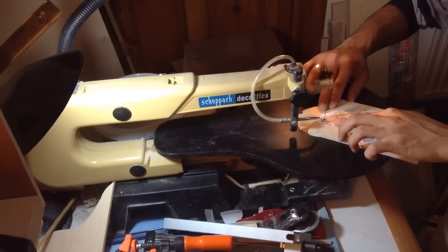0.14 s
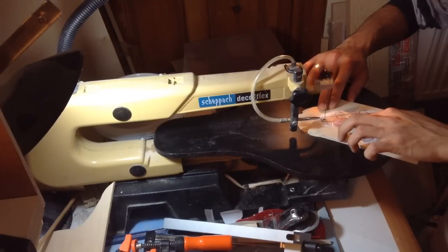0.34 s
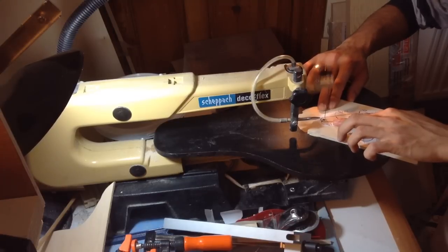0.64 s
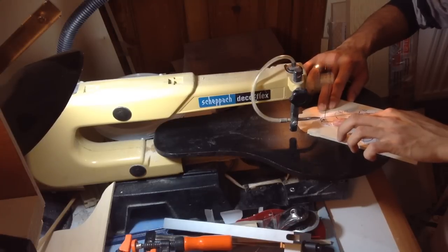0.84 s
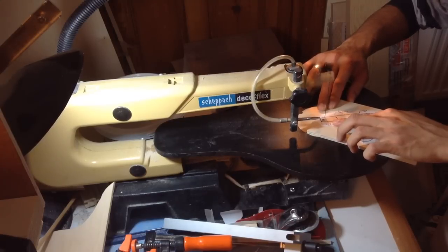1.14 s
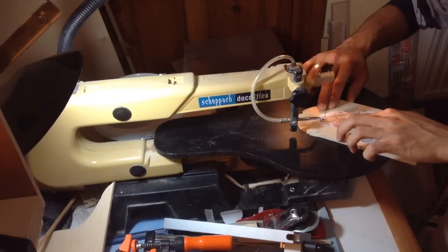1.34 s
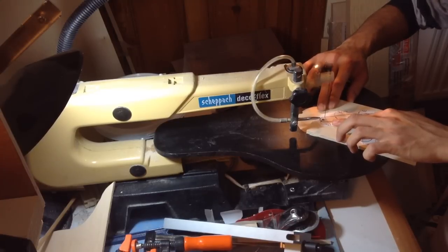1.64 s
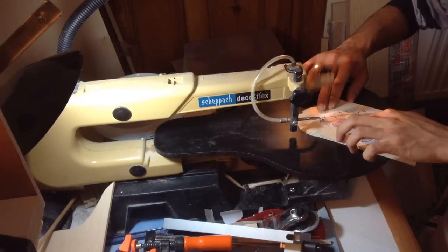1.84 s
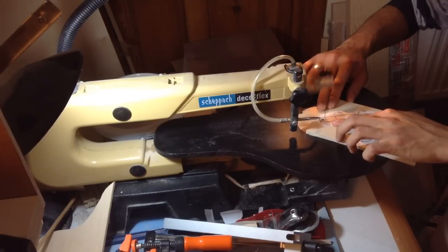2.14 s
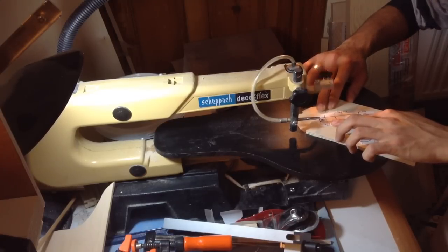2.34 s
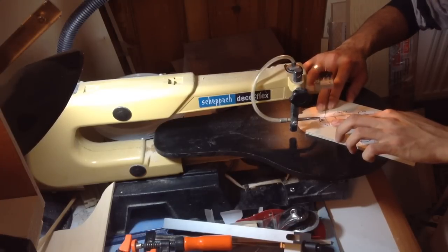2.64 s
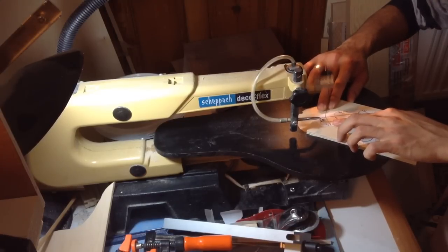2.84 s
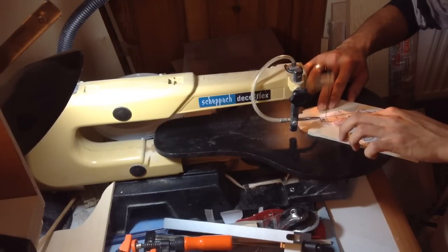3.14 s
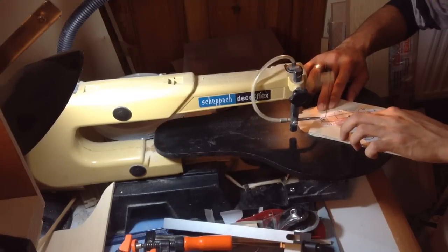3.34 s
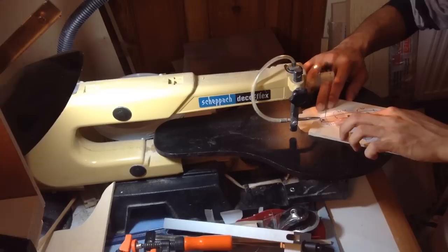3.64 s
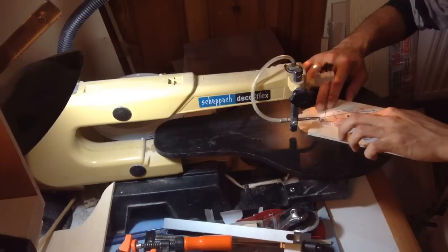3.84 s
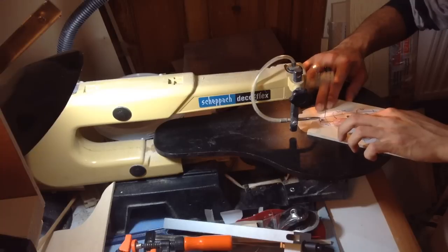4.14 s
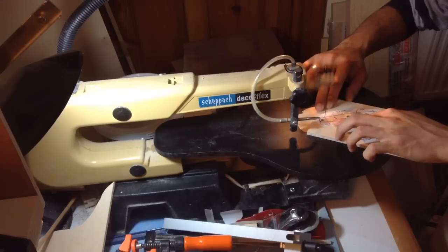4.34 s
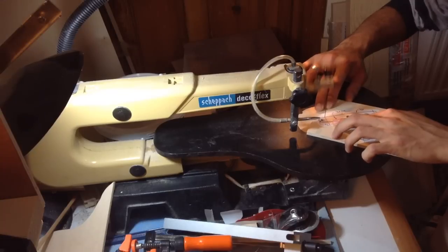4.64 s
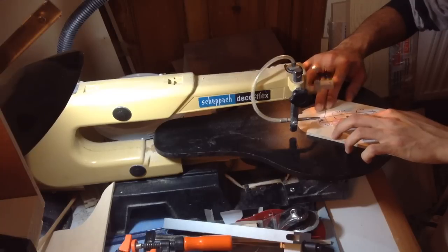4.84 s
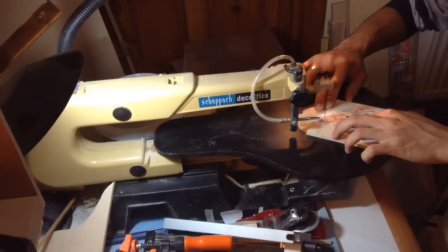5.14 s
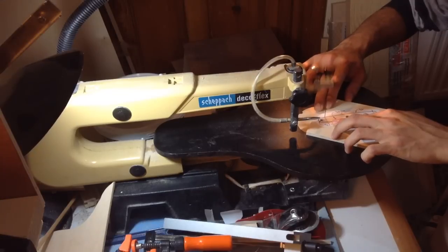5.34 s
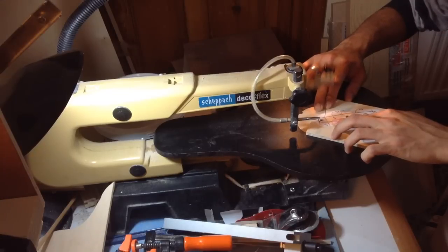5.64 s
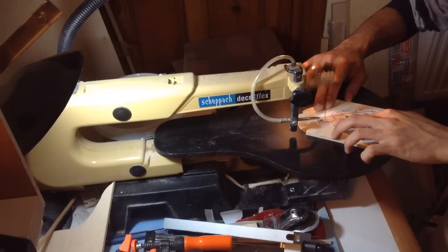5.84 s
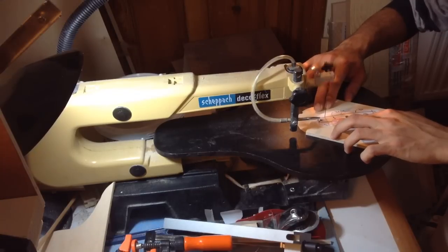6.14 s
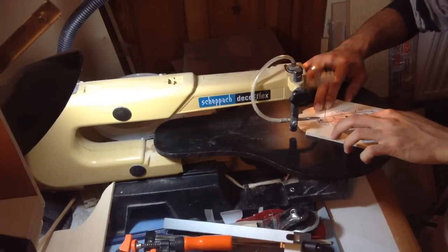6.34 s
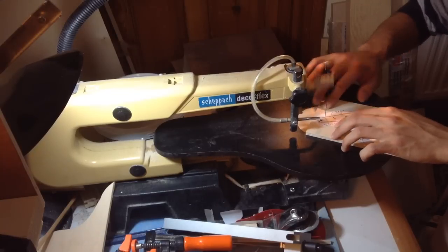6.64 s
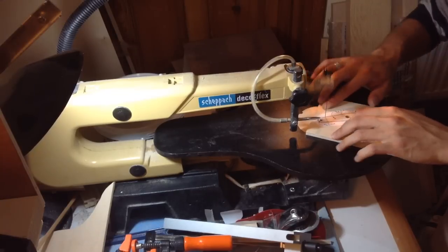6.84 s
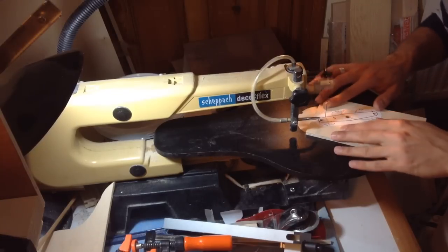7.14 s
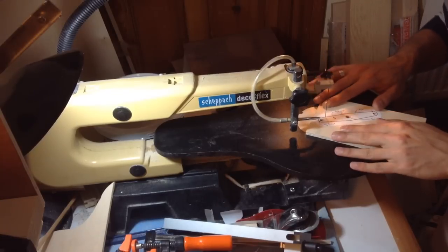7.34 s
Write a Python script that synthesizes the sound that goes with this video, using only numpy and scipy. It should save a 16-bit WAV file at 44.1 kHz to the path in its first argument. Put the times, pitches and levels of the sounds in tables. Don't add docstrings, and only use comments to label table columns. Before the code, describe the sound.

Close, fairly dry sound of a small motor saw in a little room: a rapid pulsing buzz of board hum, rattling wood, coarse rasp and thin hiss over steady fan air. Cutting drops away around three seconds, leaving a few light wooden taps and one firmer knock, then resumes at full strength. In the last second it turns into a looser, more tonal fluttering buzz, still running at the end.

```python
import sys
import numpy as np
from scipy import signal
from scipy.fft import irfft
from scipy.io import wavfile
from scipy.ndimage import uniform_filter1d

SR = 44100
rng = np.random.default_rng(int(sys.argv[2]) if len(sys.argv) > 2 else 0)


def level_to_linear(level):
    exponent = np.asarray(level, float) / 20
    return 10 ** exponent


def unload_audio(sound):
    columns = np.transpose(np.atleast_2d(sound))
    steps = np.round(np.clip(columns, -1, 1) * 32767)
    wavfile.write(sys.argv[1], SR, steps.astype(np.int16))


N = 330750
T = np.arange(N) / SR
STROKES_PER_S = 9.54

# (time [s], lead [turns])
STROKE_LEAD = [(0.2, 0.025), (1, 0.027), (1.8, 0.019), (2.6, 0.017), (3, 0.069), (3.3, 0.09), (3.6, 0.154),
               (4, 0.152), (4.8, 0.156), (5.6, 0.152), (6.4, 0.155), (7, 0.199), (7.3, 0.235)]


def crank():
    return STROKES_PER_S * T + np.interp(T, *np.transpose(STROKE_LEAD))


TURNS = crank()

# (time [s], share [0-1])
SINGING = [(0, .15), (2.85, .15), (2.95, 0), (3.55, 0), (3.8, .15), (4.6, .35), (6.3, .3), (6.7, .75),
           (7.5, .82)]


def board():
    share = np.clip(np.interp(T, *np.transpose(SINGING)), 0, 1)
    return level(part=1) * board_hum(share) + level(part=2) * board_clatter(share)


# (frequency [Hz], density [dB per Hz])
BOARD = [(200, -60), (300, -28), (360, -18), (480, -15.5), (560, -16.5), (640, -34.5), (800, -60)]
# (frequency [Hz], width [Hz], height over the smooth colour [dB])
BOARD_MODES = [(442.2, 13, 14), (458, 50, 11.6), (496, 5.4, 16.7), (529.6, 10.7, 23.6)]


def board_hum(share):
    teeth_passed = 56 / (2 * np.pi) * np.sin(2 * np.pi * (TURNS - .43))
    knocks = 2.1 * repeating(0.852) + 0.29 * np.cos(2 * np.pi * teeth_passed)
    loose = 0.64 * rng.standard_normal(N)
    turning = (STROKES_PER_S * T - .8 + .5) % 1 - .5
    note_hz = 526 - 110 * np.exp(-((turning + .01) / .11) ** 2)
    unbroken = 1 - .8 * np.exp(-((turning - .05) / .08) ** 2)
    note = evened(np.sin(2 * np.pi * np.cumsum(note_hz) / SR) * unbroken)
    flutter_band = signal.butter(2, [25, 80], "band", fs=SR)
    flutter = evened(signal.lfilter(*flutter_band, rng.standard_normal(N)))
    note = evened(note * (1 + .25 * flutter))
    ringing = coloured(knocks + loose, BOARD, BOARD_MODES)
    return np.sqrt(share) * note + np.sqrt(1 - share) * ringing


# (frequency [Hz], density [dB per Hz])
CLATTER = [(400, -44.5), (600, -25), (720, -18.5), (850, -22.5), (1050, -22.5), (1300, -22.5),
           (1800, -46.5)]
# (frequency [Hz], width [Hz], height [dB])
CLATTER_MODES = [(678.4, 8.9, 14.8), (700, 3.8, 5.8), (790, 3.7, 2.3), (828, 17, 3.1), (896, 14, 13),
                 (962, 11.5, 18.3), (1002, 10.4, 10.9), (1048.3, 5.8, 12.1)]
# (centre [turns], rise [turns], fall [turns], level [dB])
CLATTER_BURSTS = [(.45, 0.13, 0.17, -3.5), (.97, 0.24, 0.27, 0.5)]
# (frequency [Hz], width [Hz], height [dB])
LOOSE_MODES = [(684, 15, 22), (679, 5.5, 14), (807, 16, 11), (860, 48, 18.5), (890, 11, -10),
               (1052, 17, 13)]
# (centre [turns], rise [turns], fall [turns], level [dB])
LOOSE_BURSTS = [(0.52, 0.02, 0.05, -1.5), (.02, 0.12, 0.14, -23)]


def board_clatter(share):
    tooth_top_hz, tooth_turns, tooth_share = 1132, 0.079, 0.92
    mid_stroke = (TURNS - .42 + .5) % 1 - .5
    stroke = np.floor(TURNS - .42 + 1.5).astype(int)
    luck = rng.uniform(-1, 1, (80, 2))[stroke].T
    tooth_hz = (1 + 0.065 * luck[1] - 0.081 * share) * tooth_top_hz
    tooth_wave = np.cos(tooth_hz / STROKES_PER_S * np.sin(2 * np.pi * mid_stroke))
    bite = level_to_linear(2.7 * luck[0]) * np.exp(-(mid_stroke / tooth_turns) ** 2) * tooth_wave
    rattle = 1.08 * repeating(0.688) + rng.standard_normal(N) + tooth_share * bite
    tight = coloured(rattle * bursts(CLATTER_BURSTS, -6, 2.55), CLATTER, CLATTER_MODES)
    slack = coloured(rattle * bursts(LOOSE_BURSTS, -9, 0.89), CLATTER, LOOSE_MODES)
    return np.sqrt(1 - share ** 2) * tight + share * slack


# (frequency [Hz], density [dB per Hz])
TEETH = [(900, -39), (1300, -23.5), (1600, -11.5), (2100, -4), (2600, -9.5), (3300, -8.5), (4000, -15),
         (5500, -28)]
# (frequency [Hz], width [Hz], height [dB])
TEETH_MODES = [(1437, 18, 16.3), (1603, 45, 12.4), (1674, 34, 11.3), (1990, 52, 12.7), (2064, 80, 4.9),
               (2170, 56, 3.2), (2393, 53, 9.7), (2675, 51, 2.9), (3020, 40, 6.5)]
# (frequency [Hz], width [Hz], height [dB])
DRAG_MODES = [(1464, 29, 8.5), (1618, 43, 13.5), (1682, 18, 16.5), (1870, 75, 9), (2167, 35, 11),
              (2296, 46, 8.5), (2373, 23, 13), (2760, 68, 2), (3036, 67, 5.5)]
# (centre [turns], rise [turns], fall [turns], level [dB])
RASP_BURSTS = [
    (0.45, 0.09, 0.099, 2.5),
    (0.9, 0.052, 0.25, 1),
    (0.011, 0.028, 0.094, -3.5),
]
# (frequency [Hz], density [dB per Hz])
BLADE = [(3000, -36), (3800, -41), (4500, -6.5), (5700, -4), (6400, -9), (7100, -1.5), (9300, -5),
         (11200, -4.5), (12200, -2.5), (13000, -11), (13800, -39), (14800, -25), (15300, -1.5)]
# (frequency [Hz], width [Hz], height [dB])
BLADE_MODES = [(6060, 46, 1.9), (5980, 63, 2.4), (6460, 45, 3.5), (6980, 40, 2.2), (6920, 200, 6.1),
               (7580, 25, 5.4), (7600, 25, 5.2), (7830, 50, 6.3), (9100, 37, 1.2), (9070, 38, 3.4),
               (9630, 94, 4.9), (10490, 130, 9.6), (12000, 45, 3.7), (12800, 40, 4)]
# (centre [turns], rise [turns], fall [turns], level [dB])
HISS_BURSTS = [
    (0.42, 0.052, 0.07, 6.1),
    (0.93, 0.072, 0.068, 0.5),
    (0.016, 0.023, 0.073, 6.3),
]


def cut():
    fibres = splinters(1500, 3.0, 0.31)
    down = workshop(fibres * bursts(RASP_BURSTS[:1], -13.5, 1.4), 0.11, -7.5)
    up = workshop(fibres * bursts(RASP_BURSTS[1:], -12.5, 1.25), 0.11, -9.5)
    rasp = evened(coloured(down, TEETH, TEETH_MODES) + 0.76 * coloured(up, TEETH, DRAG_MODES))
    hiss = workshop(splinters(2500, 4.8, 0.43) * bursts(HISS_BURSTS, -9, 0.65), 0.076, -2.7)
    return level(part=3) * rasp + level(part=4) * coloured(hiss, BLADE, BLADE_MODES)


# (frequency [Hz], density [dB per Hz])
FRAME = [(18, -85), (30, -51), (75, -66), (89, -19.5), (124, -2), (166, -0.5), (271, 6.5), (305, -1.5),
         (400, -6), (520, -19.5), (880, -120)]
# (frequency [Hz], width [Hz], height [dB])
FRAME_MODES = [(130.5, 5.2, 10.5), (291.6, 3, -19)]


def frame():
    drive = repeating(1.71) + 0.76 * rng.standard_normal(N)
    return level(part=0) * coloured(drive, FRAME, FRAME_MODES)


# (time [s], peak level [dB])
TAPS = [
    (3.185, -34),
    (3.258, -27.5),
    (3.314, -34),
    (3.352, -31),
    (3.369, -27),
    (3.377, -26),
    (3.4745, -15),
]
# (frequency [Hz], level [dB], decay time T60 [s])
TAP_MODES = [(240, -14, .04), (380, -10, .04), (511, -4, .07), (700, -8, .035), (845, 0, .035),
             (1050, -4, .03), (1160, -5, .025), (1900, -20, .025), (2370, -17, .025), (2745, -12, .025),
             (3430, -21, .02), (4183, -17, .02), (5012, -22, .015)]


def taps():
    out, t = np.zeros(N), T[:6000]
    crack_band = signal.butter(3, [300, 1500], "band", fs=SR)
    for s, peak_db in TAPS:
        ring = np.zeros(len(t))
        for hz, db, t60 in TAP_MODES:
            pitch = rng.uniform(.97, 1.03)
            ring += level_to_linear(db - 60 * t / t60) * np.sin(2 * np.pi * hz * pitch * t)
        crack = signal.lfilter(*crack_band, rng.standard_normal(len(t)))
        ring += 1.4 * level_to_linear(-60 * t / .045) * crack
        ring *= 1 - np.exp(-t / .0009)
        out[round(s * SR):][:len(t)] += level_to_linear(peak_db) * ring / abs(ring).max()
    return signal.lfilter(*signal.butter(2, 220, "high", fs=SR), out)


# (time [s], pressure [dB])
PUSH = [(0, 4.5), (.3, -2), (.6, 2), (.85, -3.5), (1.6, -0.5), (1.95, -0.5), (2.3, -4), (2.5, 2.5),
        (3.8, 1), (4.25, 0), (4.9, -6), (5.36, -2.5), (5.6, -1.5), (5.77, -9), (6.1, -2.5), (6.45, -0.5),
        (6.8, 3), (7.5, 1)]
# (level [dB], response to push [dB per dB], drift [dB per s], easing [dB], wander [dB])
PARTS = [
    (-37, 0.14, -0.27, -4.5, 0.06),
    (-26, 0.73, 0.0939, -0.2, 2),
    (-29, 0.51, -0.2051, -2.6, 0.5),
    (-30, -0.01, -0.32, 0, -0.7),
    (-41.5, 0.02, 0.56, -5, 0.67),
]
# (idling level [dB], leaving time [s], returning time [s])
IDLE = [
    (-48, 0.22, 0.38),
    (-43, 0.12, 0.1),
    (-50, 0.18, 0.16),
    (-49, 0.19, 0.15),
    (-55.5, 0.19, 0.16),
]


def level(part):
    cut_db, follow, drift_db, ease_db, wander_db = PARTS[part]
    idle_db, leaving_s, returning_s = IDLE[part]
    wander = np.interp(TURNS, np.arange(80), np.clip(rng.standard_normal(80), -2, 2))
    ease_from_s, ease_to_s = 6.53, 7.1
    easing = np.clip((T - ease_from_s) / (ease_to_s - ease_from_s), 0, 1)
    db = cut_db + follow * np.interp(T, *np.transpose(PUSH)) + drift_db * T + ease_db * easing
    return level_to_linear(idle_db + (db - idle_db) * contact(leaving_s, returning_s) + wander_db * wander)


def contact(leaving_s, returning_s):
    lifted_s, back_s = 2.992, 3.569
    return np.clip(np.maximum((lifted_s - T) / leaving_s, (T - back_s) / returning_s), 0, 1)


def repeating(drift_s, count=6):
    patterns = irfft(np.exp(2j * np.pi * rng.random((count, 2049))))
    place = TURNS % 1 * 4096
    out = np.zeros(N)
    for k, pattern in enumerate(patterns):
        away = (T / drift_s - k + count / 2) % count - count / 2
        weight = 1 + np.cos(np.pi * np.clip(away, -1, 1))
        out += np.sqrt(weight) * np.interp(place, np.arange(4096), pattern, period=4096)
    return evened(out)


def bursts(shape, rest_db, spread_db):
    power = level_to_linear(rest_db) ** 2 * np.ones(N)
    for centre, rise, fall, db in shape:
        stroke = np.floor(TURNS - centre + .5).astype(int) + 1
        chance = np.clip(rng.standard_normal((stroke.max() + 1, 2)), -1.5, 1.5)[stroke]
        off = TURNS - centre - (stroke - 1) - 0.0054 * chance[:, 0]
        swell = np.exp(-(off / np.where(off < 0, rise, fall)) ** 2)
        power += level_to_linear(db + spread_db * chance[:, 1]) ** 2 * swell
    return evened(np.sqrt(power))


def splinters(per_s, spread_db, share):
    sizes = level_to_linear(spread_db * np.minimum(rng.exponential(1, N), 4))
    clicks = sizes * (rng.random(N) < per_s / SR) * rng.choice([-1, 1], N)
    return share * evened(clicks) + (1 - share) * rng.standard_normal(N)


def coloured(x, spectrum, modes):
    hz = abs(np.fft.fftfreq(16384, 1 / SR))
    f, db = np.transpose(spectrum)
    power = 1 + sum(level_to_linear(d) ** 2 / (1 + (2 * (hz - c) / w) ** 2) for c, w, d in modes)
    smooth_db = np.maximum(np.interp(np.log(hz + 1), np.log(f), db), -100)
    log_gain = np.log(level_to_linear(smooth_db) * np.sqrt(power))
    response = np.fft.ifft(np.exp(np.conj(signal.hilbert(log_gain)))).real[:8192]
    return evened(signal.oaconvolve(x, response)[:N])


def evened(x):
    return x / np.sqrt(np.mean(x ** 2) + 1e-20)


def workshop(x, t60, wet_db):
    at = np.arange(300, 12000, 22) + rng.integers(0, 22, 532)
    tail = np.zeros(12100)
    tail[at] = rng.choice([-1., 1.], len(at)) * level_to_linear(-60 * at / SR / t60)
    tail = signal.lfilter([1], [1, -.4], tail)
    return x + level_to_linear(wet_db) * signal.oaconvolve(x, tail / np.linalg.norm(tail))[:N]


# (frequency [Hz], density [dB per Hz])
AIR = [(60, -38), (150, 2), (600, 7.5), (2000, -14.5), (6000, -20.5), (12500, -26), (13800, -32),
       (15500, -17)]


def air():
    return level_to_linear(-41.5) * coloured(rng.standard_normal(N), AIR, [])


def scene():
    return (board() + cut() + frame() + workshop(taps(), 0.21, -13) + air())[None]


def roll_off(x):
    return signal.sosfilt(signal.butter(12, 15450, fs=SR, output="sos"), x)


def record(dry):
    soft = .42 * np.tanh(dry / .42)
    thin = signal.sosfilt(signal.butter(2, 75, "high", fs=SR, output="sos"), soft)
    hz, t, z = signal.stft(thin, SR, nperseg=2048)
    power = uniform_filter1d(uniform_filter1d(abs(z) ** 2, size=6, axis=1), size=2, axis=2)
    hiss = power[:, (hz > 6000) & (hz < 12000)].mean(1, keepdims=True)
    hiss = uniform_filter1d(hiss, size=9, axis=2)
    idle = np.interp(t, T, 1 - contact(.15, .2))
    mute_db = -9 - 5 * idle + 2.6 * np.maximum(t - 6.0, 0)
    spared_db = -5.5 * (1 - np.exp(-((hz[:, None] - 13600) / 900) ** 4))
    z = z * ((power > hiss * level_to_linear(mute_db + spared_db) ** 2) | (hz < 8000)[:, None])
    muted = signal.istft(z, SR, nperseg=2048)[1][:, :N]
    edge = signal.firwin(511, 15310, window=("kaiser", 6), fs=SR)
    return roll_off(signal.oaconvolve(muted, edge[None], "same"))


dry = scene()
out = record(dry)
unload_audio(out)
```